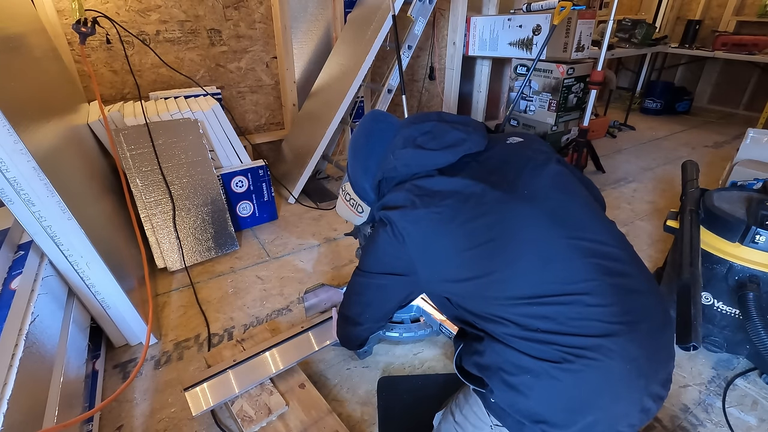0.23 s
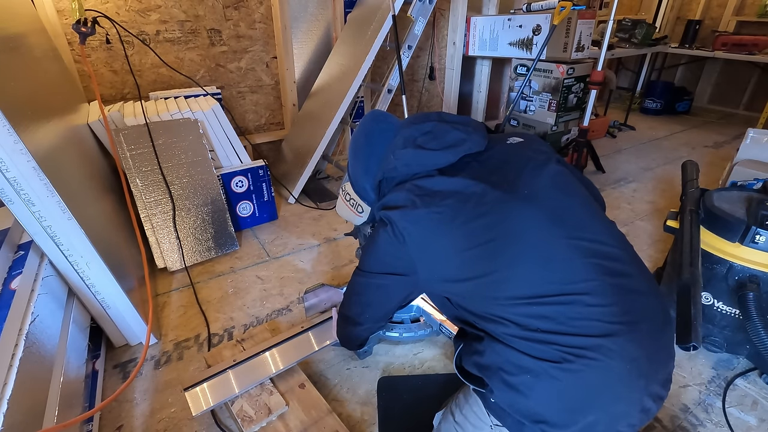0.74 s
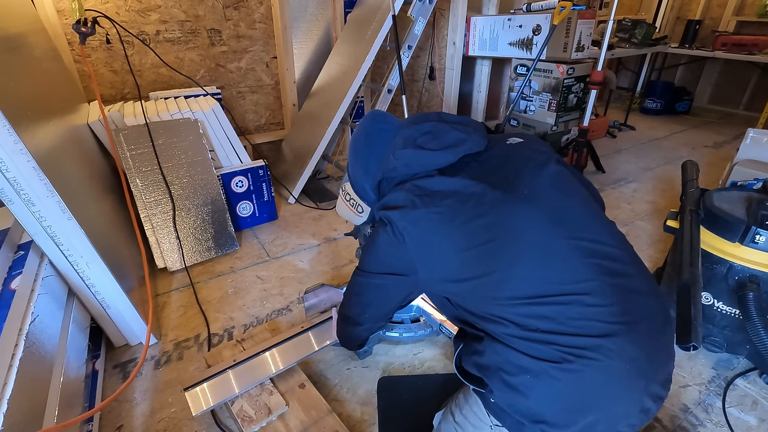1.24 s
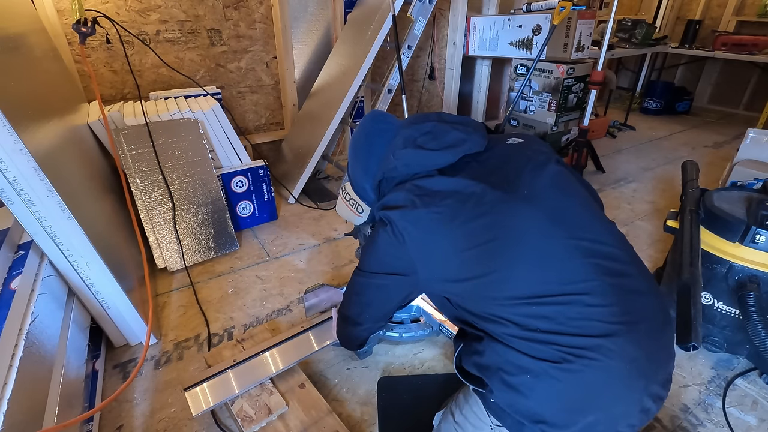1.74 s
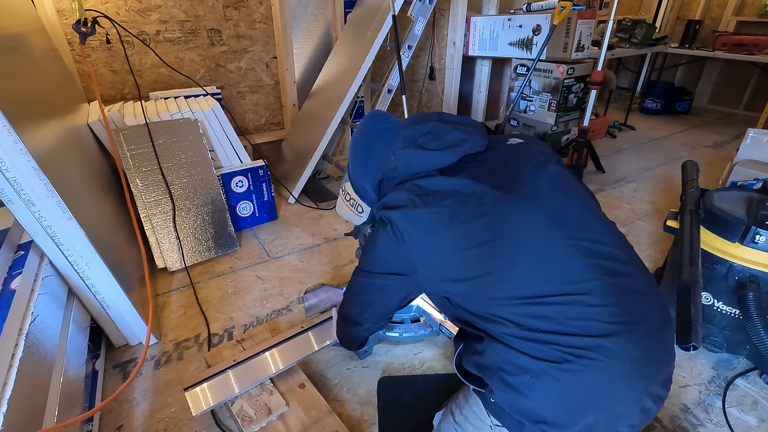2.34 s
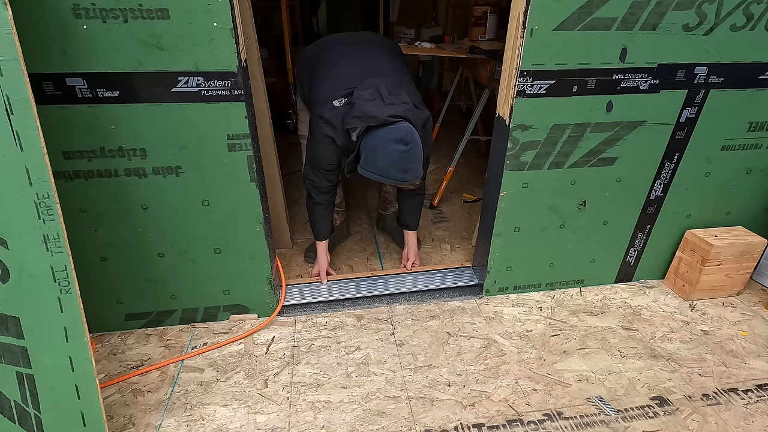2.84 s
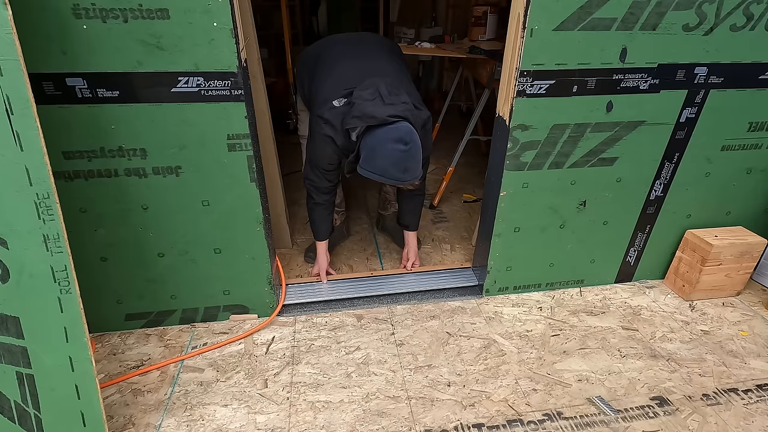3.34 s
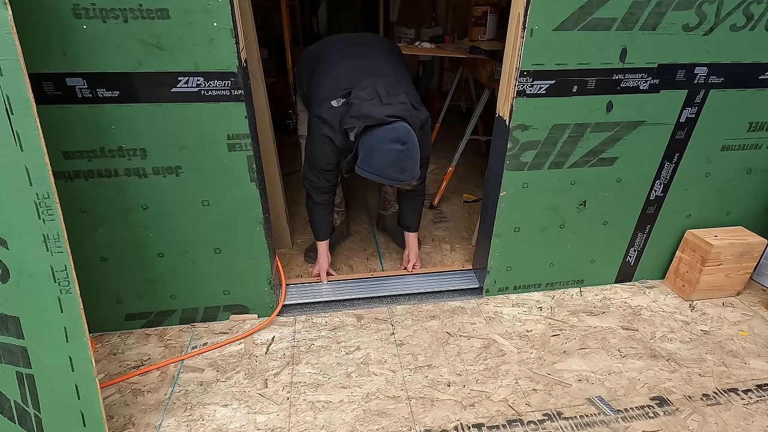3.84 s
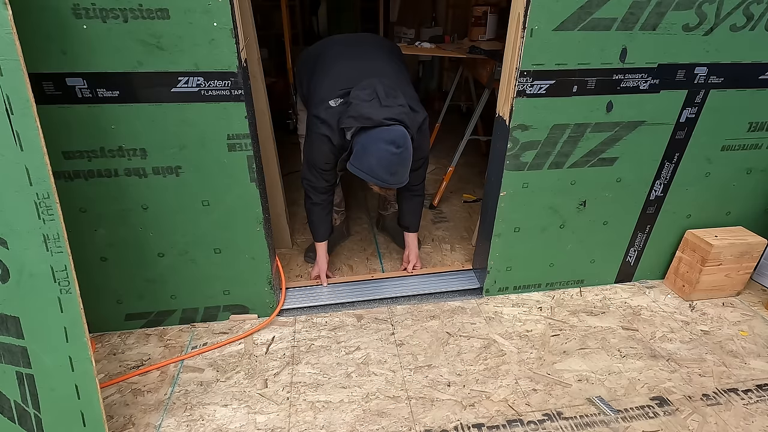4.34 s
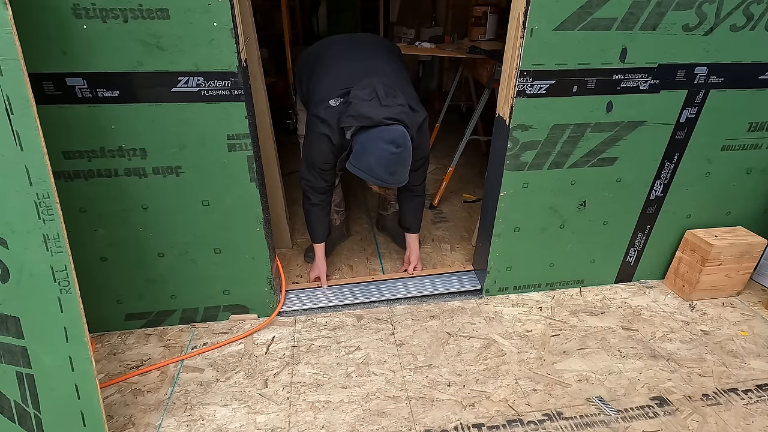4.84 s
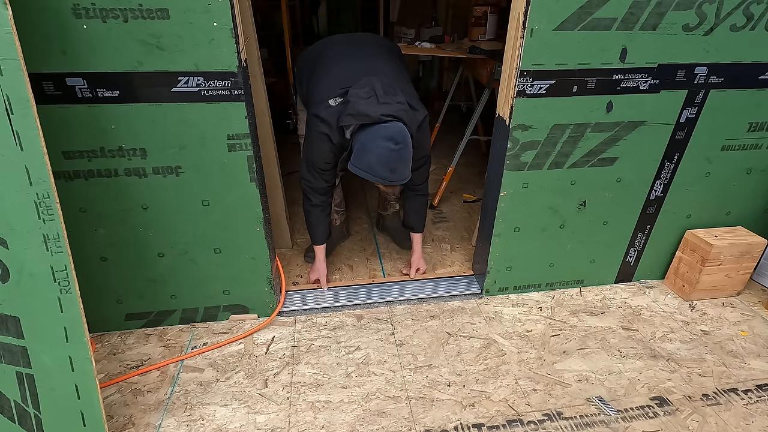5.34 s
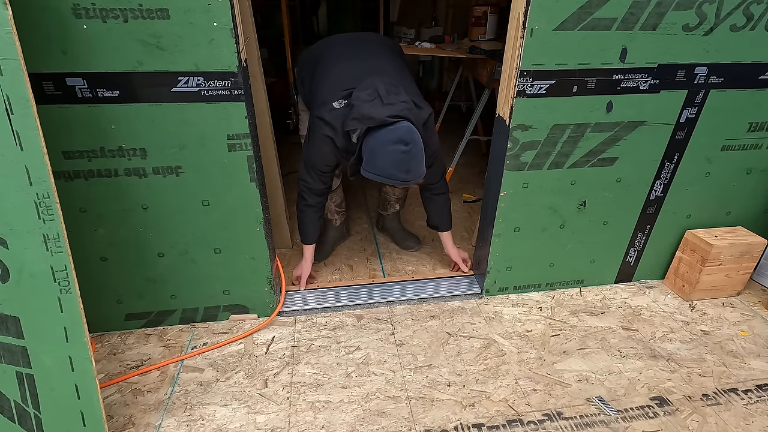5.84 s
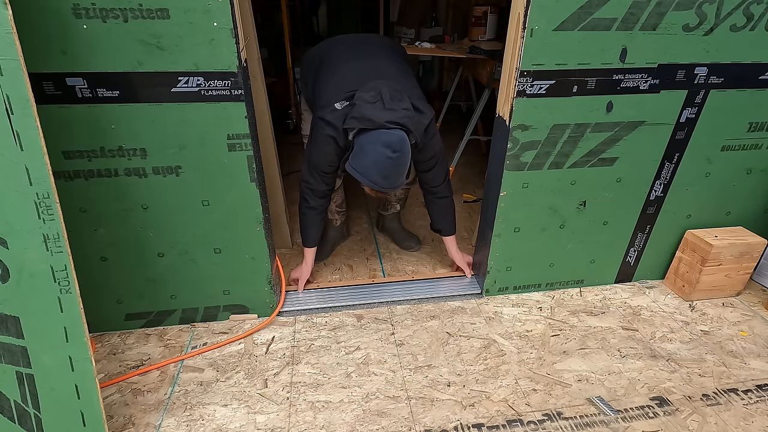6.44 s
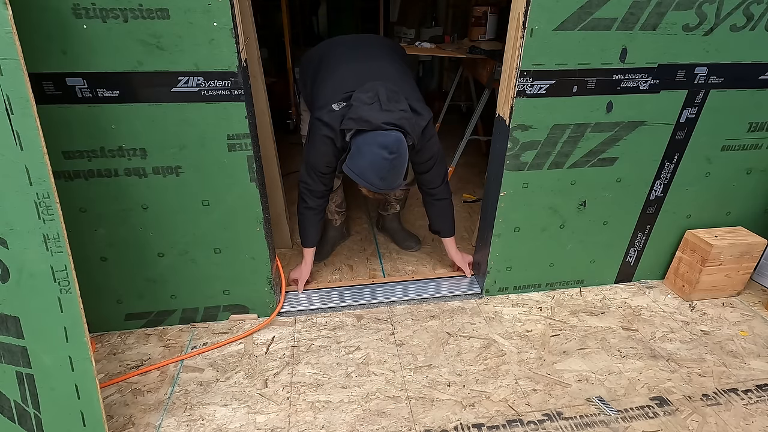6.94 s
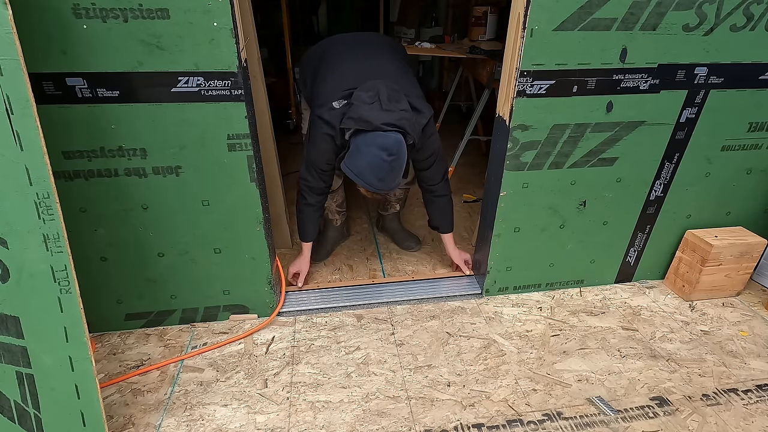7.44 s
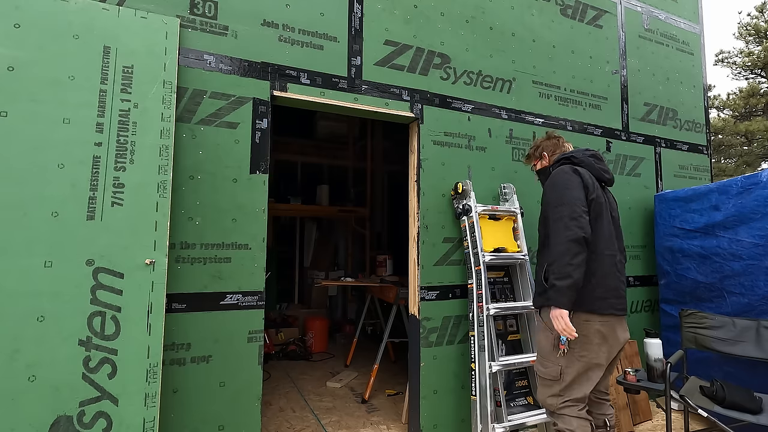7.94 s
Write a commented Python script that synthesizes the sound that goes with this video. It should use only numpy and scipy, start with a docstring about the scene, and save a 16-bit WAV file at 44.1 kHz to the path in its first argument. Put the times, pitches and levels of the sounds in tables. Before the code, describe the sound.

A power saw bites through aluminium close to the microphone, ringing and hissing over a low rumble in a timber room. It stops abruptly near three seconds, replaced by the steady, deep drone of a generator in a yard. Light wind buffets the microphone and one small double tap sounds midway. In the last moment the drone drops away to faint outdoor air with a dull thump and a weaker knock.

```python
"""In a timber shell, a circular saw with sixty alternately bevelled teeth cuts aluminium: periodic tooth
impacts give tones, chips hiss, the motor roars, and a generator drones through the walls. Handling or saw
vibration adds a lumpy rumble; from about 2.5 s wind buffets the microphone. The scene changes to the yard
beside the generator, whose engine cycle sets a harmonic series; a sill is set down with a tap.
A brief last scene lies farther off, in wind and quiet outdoor air with two knocks, in mono."""
import sys
import numpy as np
from scipy import signal
from scipy.fft import irfft
from scipy.io import wavfile
from scipy.ndimage import uniform_filter1d, map_coordinates

SR = 44100
rng = np.random.default_rng(int(sys.argv[2]) if len(sys.argv) > 2 else 0)


def put_to_file(sound):
    """Save the sound as 16-bit audio at rate SR, in the file named by the first command-line argument."""
    columns = np.atleast_2d(sound).T  # one column per channel
    safe = np.clip(columns, -1, 1)
    whole_steps = np.round(safe * 32767)
    wavfile.write(sys.argv[1], SR, whole_steps.astype(np.int16))


N = 360605
TIME = np.arange(N) / SR
SCENE_CHANGES_S = (2.873, 7.846)
SCENE_INDEX = np.searchsorted(SCENE_CHANGES_S, TIME)

# Likeness of the two channels: (frequency [Hz], coherence [-1..1])
SAW_COHERENCE = [(60, 0.88), (130, 0.47), (290, 0.93), (630, 0.79), (1380, 0.77), (3030, 0.59),
                 (6640, 0.77), (14600, 0.19)]
YARD_COHERENCE = [(60, 0.8), (150, 0.95), (370, 0.97), (930, 0.63), (2330, 0.58), (5830, 0.56),
                  (14600, -0.41)]
# Stereo balance: (frequency [Hz], left over right [dB])
SAW_BALANCE = [(60, -0.5), (130, -5), (290, 0), (630, 0.5), (1380, 2), (3030, -0.5), (6640, 1.5),
               (14600, 6.5)]
YARD_BALANCE = [(60, 3.5), (180, -1), (540, 1.5), (1620, 4.5), (4850, 4), (14600, 8.5)]


def saw(t):
    """Rotating machinery: every tone is an order, a multiple of the blade's rotation rate."""
    # Blade rotation: (time [s], speed [turns/s])
    blade_speed = [(0.0, 57.83), (0.22, 58.52), (0.6, 58.85), (1.1, 58.89), (1.54, 58.56), (1.8, 58.5),
                   (2.1, 58.2), (2.45, 58.25), (2.72, 58.1), (2.87, 57.6)]
    # Noise of cutting: (time [s], hiss [dB], roar [dB], sizzle [dB])
    noise_levels = [(0, -29.5, -39.5, -36), (.33, -29, -43, -50), (.58, -29.5, -41.5, -41.5),
                    (1.1, -33.5, -45, -40), (1.4, -33, -47, -36.5), (1.66, -31.5, -44.5, -37.5),
                    (1.8, -33.5, -49, -38.5), (2.12, -34.5, -51, -39.5), (2.22, -33.5, -43.5, -42.5),
                    (2.45, -35.5, -41, -45), (2.6, -36, -40.5, -44), (2.85, -33, -44.5, -63)]
    speed, = curves(blade_speed, t)
    turns = np.cumsum(speed) / SR
    hiss_db, roar_db, sizzle_db = curves(noise_levels, t)
    tones = tooth_impacts(t, turns) + blade_wobble(t, turns) + grabbing_teeth(t, turns)
    return tones + chip_hiss(turns, speed.mean(), hiss_db, sizzle_db) + motor_roar(roar_db)


def tooth_impacts(t, turns, teeth=60):
    """Periodic impacts sound harmonics of the tooth rate; alternate bevels add half-multiples."""
    # The tooth tones: (frequency [multiples of the tooth rate])
    multiples = (.5, 1, 1.5, 2, 3)
    # One curve per tone as the blade works through the profile: (time [s], level [dB])
    levels = [
        [(0, -55), (.3, -45), (.7, -36.5), (1.0, -38.5), (1.12, -45.5), (1.25, -37.5), (1.52, -41), (1.62, -60),
         (1.76, -48), (1.83, -38.5), (2.15, -41.5), (2.23, -53), (2.42, -43), (2.62, -56), (2.76, -41.5),
         (2.87, -37)],
        [(0, -34.5), (.25, -32), (.5, -34), (.7, -36.5), (.86, -48), (1.1, -32), (1.4, -32), (1.54, -37),
         (1.62, -33.5), (1.75, -28.5), (1.92, -28.5), (2.1, -33.5), (2.18, -37), (2.5, -44), (2.64, -32.5),
         (2.75, -35), (2.87, -31.5)],
        [(0, -50), (.18, -41), (.55, -55), (.8, -41), (1.1, -44.5), (1.4, -47), (1.6, -43), (1.85, -34.5),
         (1.98, -44), (2.08, -39), (2.22, -55), (2.45, -45), (2.65, -42.5), (2.75, -60)],
        [(0, -42), (.25, -52), (.5, -61), (.7, -36.5), (1.1, -28.5), (1.32, -35), (1.52, -33), (1.65, -35),
         (1.76, -29.5), (1.9, -38), (2.0, -34), (2.13, -32.5), (2.3, -45), (2.65, -44), (2.78, -36.5)],
        [(0, -41), (.12, -39), (.24, -50.5), (.6, -38.5), (1.1, -42), (1.22, -35.5), (1.32, -67), (1.42, -37),
         (1.6, -40.5), (1.9, -61), (2.02, -43), (2.33, -61), (2.52, -42), (2.66, -43), (2.87, -62)],
    ]
    # Direction of each tone: (left over right [dB], left phase lead [rad])
    directions = [(3.5, -0.67), (5, -0.29), (3, -0.35), (2, -0.7), (7, -1.14)]
    # Weaker tones that follow a tooth tone: (order [per turn], tone [index], relative level [dB])
    followers = [(150, 4, -7), (210, 4, -17), (240, 4, -23), (29, 0, -10), (31, 0, -6), (59, 1, -17),
                 (61, 1, -16), (89, 2, -6), (121, 3, -18), (129, 3, -14)]
    tooth_db = [curves(rows, t)[0] + 1.2 * drift(len(t), 25).real for rows in levels]
    out = 0
    for multiple, db, direction in zip(multiples, tooth_db, directions):
        cycles = teeth * multiple * turns
        out += tone(cycles, db, .14, 30, *direction)
        out += tone(cycles, db - 17, 8, 200, *direction)  # uneven bites smear a skirt round the tone
    for k, leader, db in followers:
        out += tone(k * turns, tooth_db[leader] + db, rough=.77, per_s=60, left_db=k / 40, lead=-k / 200)
    return out


def blade_wobble(t, turns):
    """Modulation: a wobbling blade puts sidebands beside the tooth tones."""
    # Sidebands: (order [per turn], relative level [dB])
    sidebands = [(58, 0), (118, -4), (178, -10), (179, -12), (181, -14), (148, -16), (62, -10), (238, -14),
                 (239, -13), (240, -15)]
    # Wobble near the end of the sawing: (start [s], end [s], level [dB])
    wobbling = [(2.51, 2.9, -39)]
    wobble_db = spells(wobbling, t, rest_db=-50)
    return sum(tone(k * turns, wobble_db + db, .59, 40, left_db=k / 60) for k, db in sidebands)


def grabbing_teeth(t, turns):
    """Friction-driven vibration: chatter and squeal swell as the teeth grab the metal."""
    # Spells of grabbing: (start [s], end [s], chatter [dB], squeal [dB])
    grabs = [(0.559, .9, -49, -53), (1.6, 1.7, -48, -60), (1.823, 1.936, -43, -50),
             (2.032, 2.121, -46, -40)]
    # Partials of each: (order [per turn], relative level [dB])
    chatter_orders = [(24, -4), (36, 0), (48, 0), (72, 0), (52, -3), (108, -4), (132, -5)]
    squeal_orders = [(40, 0), (48, 0), (50, -2), (72, 0), (74, -2), (80, 0)]
    chatter_db = spells([(start, end, db) for start, end, db, _ in grabs], t, rest_db=-59.5)
    squeal_db = spells([(start, end, db) for start, end, _, db in grabs], t, rest_db=-59)
    chatter = sum(tone(k * turns, chatter_db + db, .8, 80, 1.8, -.36) for k, db in chatter_orders)
    squeal = sum(tone(k * turns, squeal_db + db, 1, 70, 2.3, -.3) for k, db in squeal_orders)
    return chatter + squeal


def chip_hiss(turns, turns_per_s, hiss_db, sizzle_db, split_hz=9000):
    """Broadband excitation: the noise of chips is coloured by the modes of blade and workpiece."""
    # Chip noise: (frequency [Hz], relative spectral density [dB])
    spectrum = [(530, -43), (900, -10), (1280, -7), (1660, -2), (1720, -2.5), (2230, -6), (3170, -7),
                (3530, 4), (4460, -5.5), (5320, -5), (6060, -11.5), (7230, -8), (12600, -31.5),
                (14000, -32), (15000, -78)]
    # Plate resonances: (frequency [Hz], width [Hz], boost [dB])
    modes = [(2650, 81, 8.5), (3056, 51, 13), (4660, 100, 7), (6520, 130, 6), (7500, 56, -2.5),
             (8570, 58, -5), (8540, 160, 11.5), (11650, 100, 13), (13430, 90, 16)]
    runout = 1 + .15 * np.cos(2 * np.pi * turns)  # the blade bites harder once a turn
    runout += .072 * drift(len(turns), 29.5).real
    hz = np.arange(250) * turns_per_s
    order_db = resonant_db(hz, spectrum, modes) + 2.5 * rng.standard_normal(len(hz))  # no two bites alike
    bites = unit_rms(cyclic_wave(turns, order_db, 2.5, 1.2, at_hz(SAW_BALANCE, hz), per_s=4))
    chips = gain_of(-3) * bites + noise(len(turns), spectrum, SAW_COHERENCE, SAW_BALANCE, 1.2, modes)
    hiss = filtered(chips, 4, split_hz, "low")
    sizzle = filtered(chips, 4, split_hz, "high")
    return runout * (gain_of(hiss_db) * hiss + gain_of(sizzle_db) * sizzle)


def motor_roar(level_db):
    """Turbulence: motor and fan give broadband noise in the low and middle range."""
    # Roar: (frequency [Hz], relative spectral density [dB])
    spectrum = [(76, -50), (130, -15), (194, -17), (227, -5), (526, -7), (635, -1.5), (997, -8.5),
                (1600, -8), (2080, -33), (3520, -120)]
    return gain_of(level_db) * noise(len(level_db), spectrum, SAW_COHERENCE, SAW_BALANCE, patchy_db=.51)


def near_generator(t, engine_db=-23, top_order=48):
    """A harmonic series on the engine cycle, rougher upward and led by the exhaust's second order."""
    # Engine rate: (time [s], speed [cycles/s])
    engine_speed = [(2.87, 40.0), (3.6, 40.05), (5.0, 40.1), (6.0, 40.16), (7.85, 40.14)]
    # Prominent harmonics: (order [per cycle], relative level [dB])
    strong_orders = [(1, -18), (2, 2), (3, -19.5), (4, -28), (6, -23), (7, -35.5), (8, -22.5), (10, -28.5),
                     (12, -28), (14, -22), (15, -31.5), (22, -32), (25, -33), (32, -31), (35, -32),
                     (37, -33), (43, -33.5), (46, -33)]
    speed, = curves(engine_speed, t)
    turns = np.cumsum(speed) / SR
    orders = np.arange(top_order + 1)
    order_db = engine_db - 41.5 + 3 * rng.standard_normal(len(orders))  # the lesser orders scatter
    for k, db in strong_orders:
        order_db[k] = engine_db + db
    exhaust = tone(2 * turns, order_db[2], rough=.015, per_s=6.3, left_db=-.69, lead=.094)
    order_db[[0, 2]] = -np.inf  # no steady offset; the exhaust has its own direction
    balance = at_hz(YARD_BALANCE, orders * speed.mean())
    drone = cyclic_wave(turns, order_db, .0066 * orders, .0053 * orders, balance, per_s=9)
    return exhaust + drone + generator_casing(turns, speed.mean(), top_order)


def generator_casing(turns, cycles_per_s, top_order):
    """Forced vibration: resonant panels buzz above top_order and clatter in puffs with each cycle."""
    # Clatter: (frequency [Hz], relative spectral density [dB])
    spectrum = [(90, -30.5), (140, -9), (200, -13), (330, -11.5), (540, -11.5), (1250, -14.5), (2000, -18),
                (2400, -20.5), (3500, -21.5), (7800, -34), (10600, -49), (12000, -39.5), (14200, -51.5),
                (15000, -66.5)]
    # Panel resonances: (frequency [Hz], width [Hz], boost [dB])
    modes = [(406, 120, 6), (950, 120, 5), (1290, 160, 3.5), (1796, 230, 4.5), (2950, 90, 4),
             (3520, 200, 3.5), (5070, 120, 5), (6330, 63, 3), (7530, 150, 3), (12000, 150, 4),
             (13450, 200, 3)]
    hz = np.arange(250) * cycles_per_s
    buzz_db = resonant_db(hz, spectrum, modes) + 3 * rng.standard_normal(len(hz))
    buzz_db[:top_order + 1] = -np.inf
    buzz = unit_rms(cyclic_wave(turns, buzz_db, .8, .6, at_hz(YARD_BALANCE, hz), per_s=8))
    puffs = 1 + sum(depth * np.cos(2 * np.pi * (k * turns + rng.random()))
                    for k, depth in [(1, .064), (2, .071), (3, .12), (5, .045)])
    clatter = puffs * noise(len(turns), spectrum, YARD_COHERENCE, YARD_BALANCE, 1, modes)
    return gain_of(-41.5) * clatter + gain_of(-52) * buzz


def far_generator(t, cycle_hz=39.9):
    """Transmission loss rises with frequency, so only the lowest engine orders pass the walls."""
    # Drone indoors: (time [s], level [dB])
    levels = [(0, -34.5), (.17, -36.5), (.35, -31.5), (.9, -32), (1.9, -35), (2.3, -41), (2.55, -40.5),
              (2.87, -33.5)]
    # Its harmonics: (order [per cycle], relative level [dB])
    orders = [(1, -12), (2, 1.5), (3, -20), (4, -25), (5, -20.5), (6, -38)]
    drone_db, = curves(levels, t)
    return sum(tone(k * cycle_hz * t, drone_db + db, .03, 7.5, left_db=-.22) for k, db in orders)


def taps(tick_t60_s=.03, push_hz=95, length=8000):
    """Damped impacts: a bright tick, a dull body that rings longer, and a low push through the ground."""
    # Knocks: (time [s], body [dB], body T60 [s], tick [dB], push [dB])
    knocks = [(5.443, -30, 0.095, -33.5, -45), (5.472, -40, .1, -48, -50), (7.896, -43, .1, -44, -19.5),
              (8.097, -44, 0.085, -55, -47)]
    out, t = np.zeros(N + length), TIME[:length]
    attack = np.minimum(t / .001, 1)
    for start, body_db, t60, tick_db, push_db in knocks:
        grit = rng.standard_normal(length)
        body = gain_of(body_db - 60 * t / t60) * filtered(grit, 3, [500, 1300])
        tick = gain_of(tick_db - 60 * t / tick_t60_s) * filtered(grit, 4, [1500, 5500])
        push = gain_of(push_db) * np.sin(2 * np.pi * push_hz * t) * np.exp(-((t - .007) / .014) ** 2)
        out[round(start * SR):][:length] += (body + tick) * attack - push
    return out[:N]


def rumble_and_wind():
    """Structure-borne rumble of handling or saw indoors; from about 2.5 s, wind on the microphone."""
    # Steady low noise, one row per scene: (deep band [dB], upper band [dB])
    floors = [(-46.5, -53), (-54, -71), (-40.5, -58)]
    # Bumps, then gusts from about 2.5 s: (peak time [s], length [s], deep band [dB], upper band [dB])
    swells = [(1.163, .05, -43, -50), (1.89, .08, -38, -46), (2.066, .06, -43, -44),
              (2.648, .1, -36, -36.5), (2.737, 0.068, -42, -35), (2.823, 0.14, -35, -37),
              (4.632, 0.064, -37, -35), (4.76, .08, -36, -46), (5.756, .05, -41, -39.5),
              (6.013, 0.065, -34, -41), (7.879, 0.069, -43, -30.5), (7.92, .04, -32, -45),
              (8.037, 0.11, -43, -48.5)]
    deep = filtered(rng.standard_normal((2, N)), 3, [32, 56])
    upper = filtered(rng.standard_normal((2, N)), 3, [80, 200])
    gains = gain_of(np.transpose(floors)[:, SCENE_INDEX] + 3.8 * drift(N, 8.6).real)
    for peak, length, *db in swells:
        gains += np.outer(gain_of(db), np.exp(-(2 * (TIME - peak) / length) ** 2))
    mid, side = gains[0] * deep + gains[1] * upper
    return np.array([mid + .3 * side, mid - .3 * side])


def outdoor_air(length):
    """Ambient noise: a soft continuous spectrum that falls toward the treble."""
    # Quiet air: (frequency [Hz], relative spectral density [dB])
    spectrum = [(120, -24), (200, -6), (262, -14), (357, -8), (550, -6.5), (761, -10), (864, -9.5),
                (1360, -17.5), (15000, -57.5)]
    return gain_of(-43.5) * noise(length, spectrum, YARD_COHERENCE, YARD_BALANCE, patchy_db=.9)


def gain_of(db):
    return 10 ** (np.asarray(db) / 20)


def unit_rms(x):
    return x / np.sqrt(np.mean(x ** 2) + 1e-20)


def filtered(x, order, edges_hz, kind="band"):
    """Band limiting, with the result scaled to unit rms."""
    return unit_rms(signal.sosfilt(signal.butter(order, edges_hz, kind, fs=SR, output="sos"), x))


def at_hz(points, hz):
    """Interpolation on a logarithmic frequency axis."""
    frequencies, values = np.transpose(points)
    return np.interp(np.log(hz + 1), np.log(frequencies + 1), values)


def curves(rows, t):
    """Linear interpolation in time, one curve per value column."""
    times, *columns = np.transpose(rows)
    return [np.interp(t, times, column) for column in columns]


def drift(length, per_s):
    """Random modulation: a complex signal that takes per_s new values a second."""
    real, imag = rng.standard_normal((int(length / SR * per_s) + 2, 2)).T
    return np.interp(np.arange(length) / SR * per_s, np.arange(len(real)), real + 1j * imag) * np.sqrt(1.5)


def spells(rows, t, rest_db, swell_s=.076, die_s=.03):
    """Powers add: the wavering level [dB] of spells that swell and die above a resting floor."""
    power = sum(gain_of(2 * db) * np.interp(t, [start - swell_s, start, end, end + die_s], [0, 1, 1, 0]) ** 2
                for start, end, db in rows)
    return 10 * np.log10(power + gain_of(2 * rest_db)) + drift(len(t), 12).real


def resonant_db(hz, spectrum, modes):
    """Resonance: each mode raises a bell-shaped peak on a spectrum [dB]."""
    return at_hz(spectrum, hz) + sum(db / (1 + (2 * (hz - f) / width) ** 2) for f, width, db in modes)


def tone(cycles, db, rough, per_s, left_db=0., lead=0.):
    """Line broadening: a stereo sinusoid of rms level db wanders in amplitude and phase."""
    wander = (1 + rough * drift(len(cycles), per_s)) / np.sqrt(1 + 2 * rough ** 2)
    phasor = np.sqrt(2) * gain_of(db) * wander * np.exp(2j * np.pi * (cycles + rng.random()))
    side = gain_of(left_db / 2) * np.exp(.5j * lead)
    return np.array([(phasor * side).real, (phasor / side).real])


def cyclic_wave(turns, order_db, rough, unlike, left_db, per_s):
    """Harmonic synthesis: orders 0, 1, 2... form a wave that repeats each turn and slowly changes."""
    size, frames = 4096, int(len(turns) / SR * per_s) + 2
    a, b, c, d = rng.standard_normal((frames, len(order_db), 4)).T
    steady = np.exp(2j * np.pi * rng.random(len(order_db)))
    left = steady + rough * (a + 1j * b).T
    right = left + unlike * ((c + 1j * d).T + c[:, 0])
    spectra = np.array([left, right]) / np.sqrt(1 + 2 * rough ** 2)
    spectra *= gain_of(order_db + np.outer([.5, -.5], left_db))[:, None]
    waves = irfft(spectra, size) * size / np.sqrt(2)
    position = [TIME[:len(turns)] * per_s, (turns % 1) * size]
    return np.array([map_coordinates(wave, position, order=1, mode="grid-wrap") for wave in waves])


def noise(length, spectrum, coherence, balance, patchy_db, modes=()):
    """Partial coherence: two channels share part of a coloured noise with drifting patches of level."""
    frames, hz = length // 256 + 5, np.fft.rfftfreq(1024, 1 / SR)
    a, b, c, d, patches = rng.standard_normal((frames, len(hz), 5)).T
    patches = unit_rms(uniform_filter1d(uniform_filter1d(patches, size=10, axis=0), size=10, axis=1))
    shared = at_hz(coherence, hz)[:, None]
    left = a + 1j * b
    right = shared * left + np.sqrt(1 - shared ** 2) * (c + 1j * d)
    spectra = np.array([left, right])
    spectra *= gain_of(resonant_db(hz, spectrum, modes)[:, None] + patchy_db * patches)
    spectra *= gain_of(np.outer([.5, -.5], at_hz(balance, hz)))[:, :, None]
    return unit_rms(signal.istft(spectra, nperseg=1024, noverlap=768)[1][:, :length])


def scene(fade_s=.003):
    """Superposition: low noise and taps are added to three scenes joined by short fades."""
    inside_t, yard_t, distant_t = (TIME[SCENE_INDEX == i] for i in range(3))
    inside = saw(inside_t) + far_generator(inside_t)
    yard = near_generator(yard_t)
    air = outdoor_air(len(distant_t))
    fade = np.prod([np.minimum(abs(TIME - s) / fade_s, 1) for s in SCENE_CHANGES_S], axis=0)
    return np.hstack([inside, yard, air]) * fade + rumble_and_wind() + taps()


def record(dry, cutoff_hz=14900):
    """Mid-side mixing sets each scene's stereo width; a steep low-pass limits the band."""
    # Stereo width, one value per scene: (side gain [ratio])
    widths = (.85, 1., 0.)
    mid = (dry[0] + dry[1]) / 2
    side = (dry[0] - dry[1]) / 2 * np.take(widths, SCENE_INDEX)
    lowpass = signal.firwin(1023, cutoff_hz, window=("kaiser", 12), fs=SR)
    return signal.oaconvolve(np.array([mid + side, mid - side]), lowpass[None], "same")


dry = scene()
out = record(dry)
put_to_file(out)
```